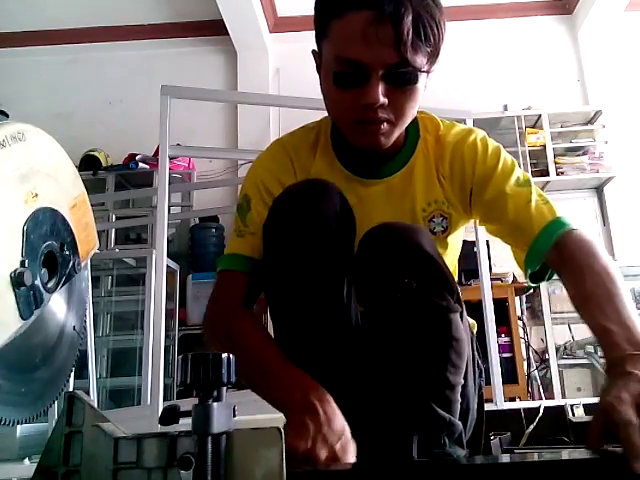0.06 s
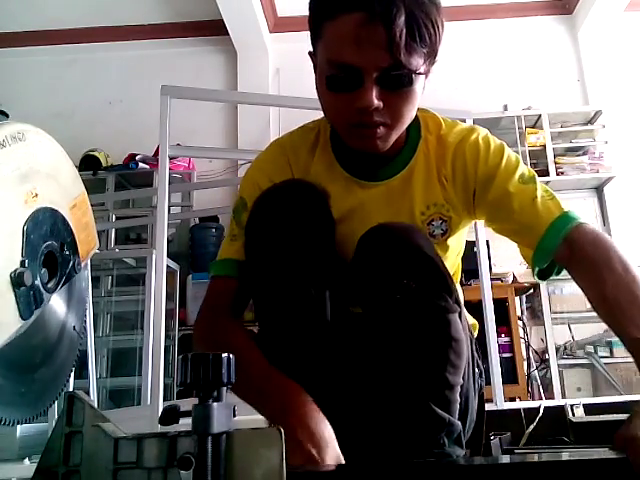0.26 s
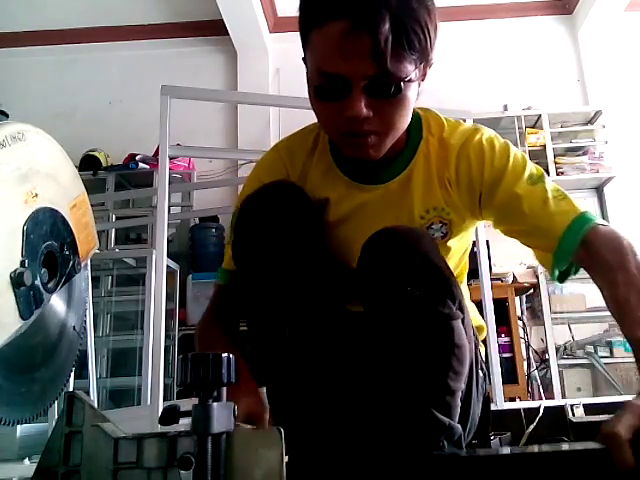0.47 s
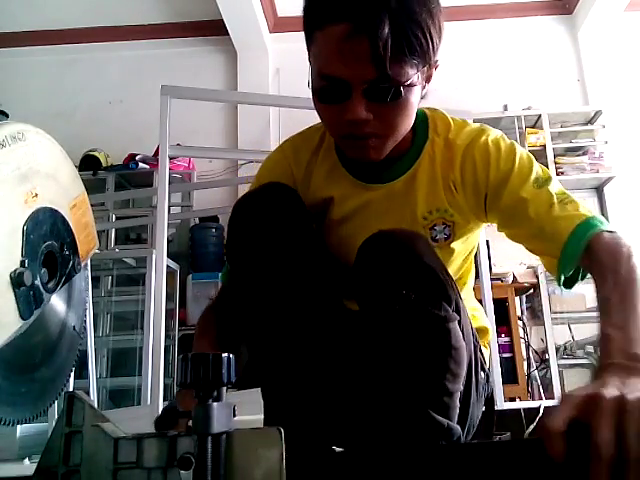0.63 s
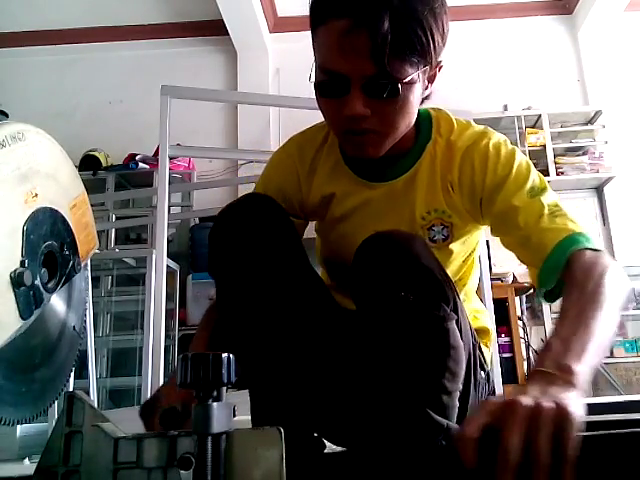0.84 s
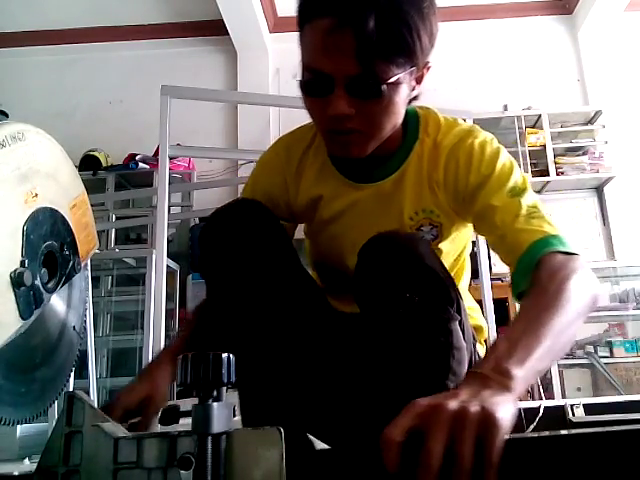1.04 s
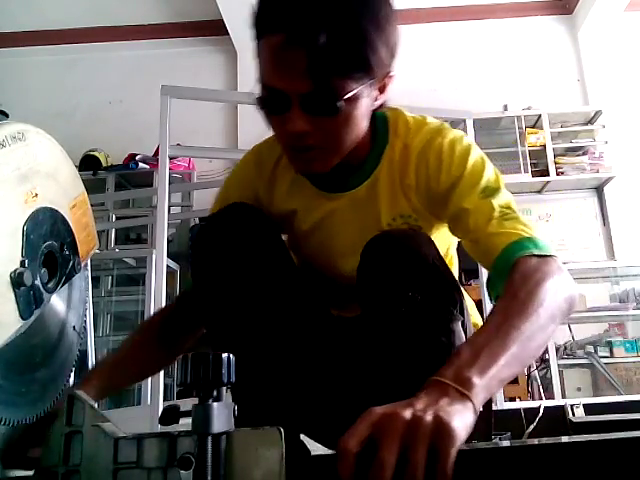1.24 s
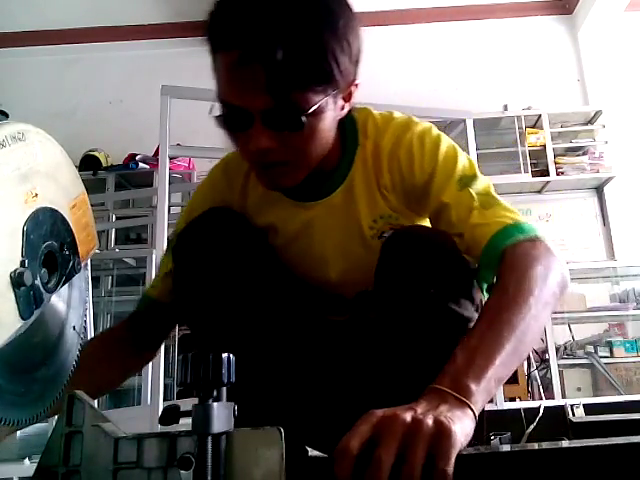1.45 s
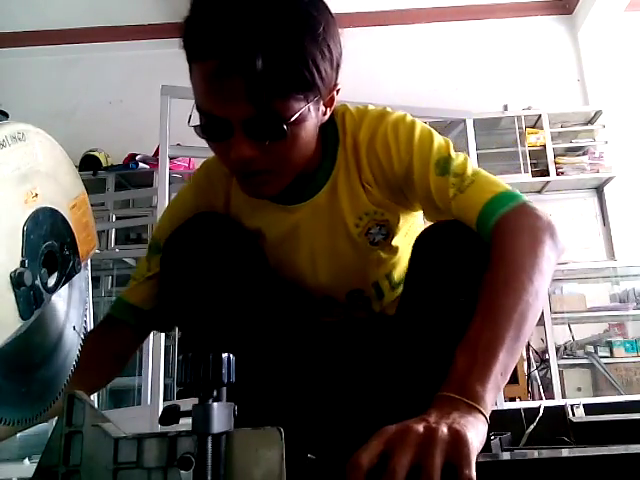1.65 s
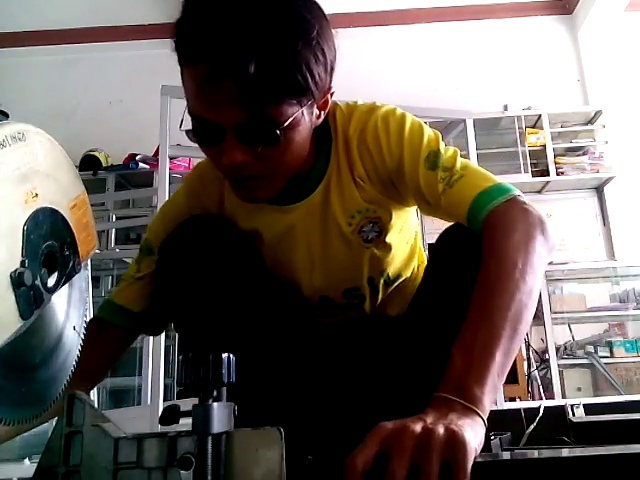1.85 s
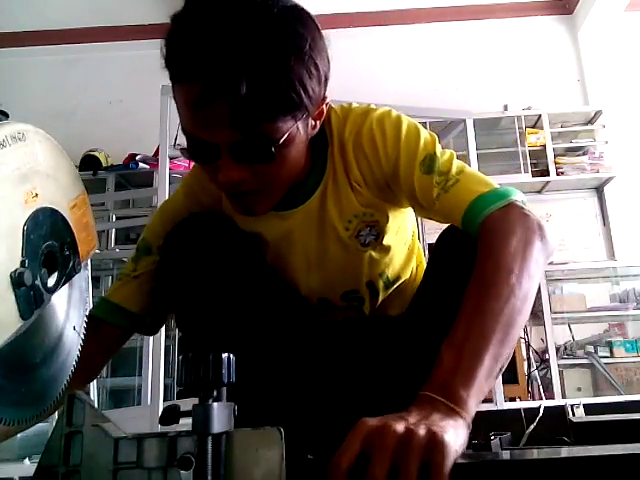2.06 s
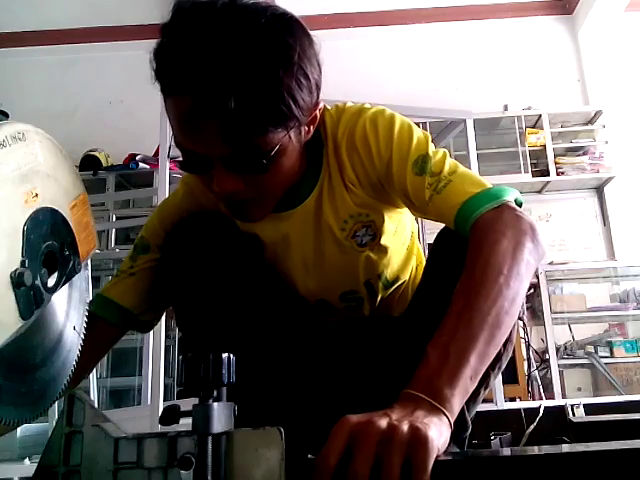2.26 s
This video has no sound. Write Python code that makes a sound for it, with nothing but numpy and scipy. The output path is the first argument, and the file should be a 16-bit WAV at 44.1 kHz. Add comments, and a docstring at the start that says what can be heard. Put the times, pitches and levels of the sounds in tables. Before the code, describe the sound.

Metal scrapes on metal over a low workshop rumble. A small piece clinks close by at 0.2 seconds, then a bar is struck and screeches, fading by 0.7 seconds. Soft bench bumps and a faint, thin squeal follow. From about 1 second to the end, a long bar slides with a hissing rasp and a wavering whirr, clanking once at around 1.7 seconds.

```python
"""Aluminium at the saw bench

Over a low workshop rumble, a small piece clinks and something bumps the bench. Metal bites on
metal: a strike and a stream of tiny slips ring a bar in a short screech. Then a long bar slides
along with a rasp whose whirr and sheen follow its speed, and clanks once on the way."""
import sys
import numpy as np
from scipy import signal
from scipy.fft import rfft, irfft, next_fast_len
from scipy.io import wavfile
from scipy.ndimage import uniform_filter1d, map_coordinates

SR = 44100
rng = np.random.default_rng(int(sys.argv[2]) if len(sys.argv) > 2 else 0)


def store_pcm(level_fs):
    """Save levels as 16-bit WAV."""
    pcm = np.round(np.clip(level_fs, -1, 1) * 32767).astype(np.int16)
    wavfile.write(sys.argv[1], SR, np.atleast_2d(pcm).T)


N = 101429
TIME = np.arange(N) / SR


def from_db(db):
    """Decibels to gain."""
    return 10 ** (np.asarray(db) / 20)


def rms_one(x):
    """Scale to rms 1."""
    return x / np.sqrt(np.mean(x ** 2) + 1e-20)


def evened(x):
    """Level out chance swells."""
    return x / np.sqrt(uniform_filter1d(x * x, size=1500) + 1e-9)


def automation(rows):
    """Breakpoints to one curve per column, sample by sample."""
    times, *columns = np.transpose(rows)
    return [np.interp(TIME, times, column) for column in columns]


def envelope(start_s, attack_s, t60_s):
    """Linear rise, exponential fall."""
    age = TIME - start_s
    return np.clip(age / attack_s, 0, 1) * from_db(-60 * np.maximum(age - attack_s, 0) / t60_s)


def highpass(x, hz):
    """Roll off the bass."""
    return signal.sosfilt(signal.butter(2, hz, "high", fs=SR, output="sos"), x)


def lowpass(x, hz, order=4):
    """Roll off the treble."""
    return signal.sosfilt(signal.butter(order, hz, fs=SR, output="sos"), x)


def coloured(x, spectrum):
    """Give a steady signal a spectrum; rms 1."""
    hz, db = np.transpose(spectrum)
    size = next_fast_len(N)
    bin_hz = np.maximum(np.fft.rfftfreq(size, 1 / SR), 1)
    gain = from_db(np.interp(np.log(bin_hz), np.log(hz), db))
    return rms_one(irfft(rfft(x, size) * gain, size)[:N])


def noise(spectrum):
    """Steady noise with a spectrum; rms 1."""
    return coloured(rng.standard_normal(N), spectrum)


def drift(rate_hz):
    """Smooth random wander; rms 1."""
    pole = np.exp(-2 * np.pi * rate_hz / SR)
    return rms_one(signal.lfilter([1], [1, -2 * pole, pole * pole], rng.standard_normal(N + SR))[SR:])


def rough_tone(hz, width_hz):
    """A tone, steady or gliding, whose strength and phase wander."""
    phase = 2 * np.pi * np.cumsum(np.broadcast_to(hz, N)) / SR
    return drift(width_hz) * np.cos(phase) + drift(width_hz) * np.sin(phase)


def ring(drive, hz, t60_s):
    """One mode: a unit click rings at height 1."""
    radius, angle = from_db(-60 / (t60_s * SR)), 2 * np.pi * hz / SR
    return signal.lfilter([.5, 0, -.5], [1, -2 * radius * np.cos(angle), radius ** 2], drive + 1e-18)


# Room tone: freq_hz, density_db
RUMBLE_SPECTRUM = [(25, -12), (45, -25), (62, -5), (80, 0), (105, -2), (150, 2), (220, -5), (330, -2.5),
                   (450, -16), (800, -17), (2000, -22.5), (3300, -18.5), (4400, -18.5), (5300, -19),
                   (7000, -37.5), (10500, -37.5), (15000, -55)]

def rumble():
    """The workshop's steady low rumble and faint hiss."""
    return from_db(-41) * noise(RUMBLE_SPECTRUM)


# Knocks on the bench: start_s, level_db, t60_s
BUMP_HITS = [(0.0, -40, 0.18), (0.182, -36, 0.036), (0.636, -36.5, 0.41), (0.668, -36, 0.37),
             (0.827, -39.5, 0.64)]
# Their dull body: freq_hz, density_db
BUMP_SPECTRUM = [(100, -26), (220, 10), (400, -3.5), (600, 1.5), (900, -4), (1150, 0.5), (1600, -6.5),
                 (2200, -42)]

def bumps():
    """Soft knocks draw dull thuds from the bench."""
    thuds = sum(from_db(db) * envelope(start, .012, t60) for start, db, t60 in BUMP_HITS)
    return thuds * noise(BUMP_SPECTRUM)


# Swells of the boom: time_s, level_db
BOOM_LEVEL = [(0, -33), (0.1, -50), (0.2, -39.5), (0.32, -54.5), (0.56, -44.5), (0.63, -46), (0.69, -36),
              (0.76, -37), (0.83, -53), (1.0, -83)]

def boom():
    """A low boom swells and fades on one pitch."""
    level_db, = automation(BOOM_LEVEL)
    return from_db(level_db) * evened(rough_tone(217.5, width_hz=9.9))


# Light brushes: start_s, level_db, t60_s
SCUFF_HITS = [(0.0, -41, 0.15), (0.617, -46, .04), (0.737, -31.5, 0.034), (0.905, -44, .15),
              (2.13, -35, 0.27)]
# Bright contact noise of scuffs and clinks: freq_hz, density_db
CONTACT_SPECTRUM = [(600, -28), (2000, -7), (3000, -18), (3800, 23.5), (5000, 19.5), (6800, -20),
                    (8300, -8.5), (10200, -1.5), (12000, -11.5), (15000, -47)]

def scuffs():
    """Light contacts give off short puffs of bright noise."""
    puffs = sum(from_db(db) * envelope(start, t60 / 10, t60) for start, db, t60 in SCUFF_HITS)
    return puffs * noise(CONTACT_SPECTRUM)


# Contacts of the small piece, then the two clicks of the bar's strike: start_s, ring_db, crack_db, contact_s
CLINK_HITS = [(0.138, -28, -37, 0.0079), (0.1838, -16.5, -24, 0.01), (0.205, 0.5, -8.5, 0.00056),
              (0.2486, -20, -13, 0.0011), (0.2518, -22, -10, 0.00072)]
# Its ring: pitch_hz, gain_db, t60_s
PIECE_MODES = [(2945, -30, .035), (3575, -20, .035), (3871, -15, .04), (4646, -2, .035), (5965, -10, .04),
               (7946, -20, .033), (8586, -24, .035), (9862, -23, .032)]

def clinks():
    """Each contact cracks and rings the small piece; longer, grazing contacts crack more softly."""
    hits, cracks = np.zeros(N), np.zeros(N)
    for start, ring_db, crack_db, contact_s in CLINK_HITS:
        hits[int(start * SR)] += from_db(ring_db)
        cracks += from_db(crack_db) * envelope(start, contact_s, t60_s=0.027)
    tone = sum((-1) ** k * from_db(db) * ring(hits, hz, t60)
               for k, (hz, db, t60) in enumerate(PIECE_MODES))
    # The piece's ring keeps to the band of its modes, with little bass and little high treble.
    tone = lowpass(highpass(tone, hz=2850), hz=10400)
    return from_db(-1.5) * tone + cracks * noise(CONTACT_SPECTRUM)


def slips(per_s=9000, spread_db=1.04):
    """Dense, uneven micro-slips of metal on metal."""
    sizes = from_db(spread_db * np.minimum(rng.exponential(1, N), 5))
    signs = rng.choice([-1, 1], N)
    return sizes * signs * (rng.random(N) < per_s / SR)


# How the metal bites: time_s, force_db, tilt_db_per_octave
BITE = [(0.247, -84, 23), (0.252, 0.5, -2), (0.29, -1, 0), (0.326, -2.5, -4), (0.341, 5, -1),
        (0.366, -3.5, 5), (0.383, 3.5, -0.5), (0.415, -2.5, 2), (0.437, 1.5, 0), (0.49, -1.5, 1),
        (0.54, -5, 0.5), (0.6, -11, -1), (0.66, -18, -7.5), (0.76, -27.5, -10), (0.86, -34, -5.5)]
# Ring of the scraped bar: pitch_hz, scraped_db, struck_db
SCRAPED_BAR_MODES = [(738, -51, -45), (1068, -50, -31), (1243, -40, -46), (1460, -49, -41),
                     (1828, -41, -36), (1875, -42, -35), (2331, -44, -39), (2498, -42, -30),
                     (2790, -44, -34), (2870, -42, -39), (3241, -36, -38), (3276, -35, -26),
                     (3678, -33, -26), (3986, -27, -24), (4021, -30, -24), (4106, -28, -27),
                     (4247, -30, -38), (4344, -26, -24), (4382, -29, -27), (4490, -34, -41),
                     (4615, -33, -44), (4700, -37, -32), (4786, -25, -37), (4988, -31, -26),
                     (5266, -31, -27), (5740, -38, -58), (6315, -39, -51), (6928, -39, -45),
                     (7650, -49, -55), (8193, -50, -46), (10088, -44, -56), (10280, -50, -43)]
# Grit at the contact: freq_hz, density_db
RASP_SPECTRUM = [(600, -58), (950, -34), (1300, -18.5), (2100, -22), (3000, -14.5), (3600, -6), (4400, 2.5),
                 (5100, -3), (5900, -10), (7000, -17.5), (8800, -22), (11500, -21), (15000, -37)]

def screech(strike_s=.2505, strike_db=1.5, scrape_db=-8, rasp_db=-21, centre_hz=4140):
    """The bar is struck, then chattering slips rasp and keep it ringing as the brightness shifts."""
    force_db, tilt = automation(BITE)
    force_db += drift(rate_hz=43)  # chatter, 1 dB rms
    strike, bar = np.zeros(N), np.zeros(N)
    strike[int(strike_s * SR)] = from_db(strike_db)
    for k, (hz, scraped_db, struck_db) in enumerate(SCRAPED_BAR_MODES):
        t60 = 0.16 * (centre_hz / hz) ** .5  # low modes ring longer
        push = slips() * from_db(force_db + tilt * np.log2(hz / centre_hz))
        bar += from_db(scrape_db + scraped_db) * rms_one(ring(push, hz, t60))
        bar += (-1) ** k * from_db(struck_db) * ring(strike, hz, t60)
    bar = lowpass(highpass(bar, hz=352), hz=11000)
    rasp = coloured(slips(), RASP_SPECTRUM)
    treble = signal.sosfiltfilt(signal.butter(2, 5800, "high", fs=SR, output="sos"), rasp)
    rasp += treble * (from_db(2.2 * tilt) - 1)  # a high shelf rides the tilt
    return bar + from_db(rasp_db + force_db) * rasp


# Groan under the screech: time_s, pitch_hz, level_db
GROAN_CURVE = [(0.25, 720, -52), (0.295, 722, -41), (0.37, 745, -46), (0.42, 772, -40), (0.49, 765, -47.5),
               (0.55, 735, -51), (0.61, 730, -78)]

def groan():
    """A wavering stick-slip tone of the scraped bar."""
    hz, level_db = automation(GROAN_CURVE)
    return from_db(level_db) * evened(rough_tone(hz, width_hz=25))


# Squeal leading into the slide: time_s, pitch_hz, level_db
SQUEAL_CURVE = [(0.72, 4450, -48), (0.78, 4420, -43), (0.88, 4400, -48), (0.93, 4470, -42.5),
                (1.0, 4330, -38.5), (1.07, 4150, -54), (1.14, 4100, -66)]

def squeal():
    """The long bar squeals thinly as it starts to move."""
    hz, level_db = automation(SQUEAL_CURVE)
    return from_db(level_db) * rough_tone(hz, width_hz=63)


# Low-end weight of the thump: freq_hz, density_db
THUMP_SPECTRUM = [(15, -6), (28, 0), (50, -10), (80, 6), (140, -13), (400, -47), (2000, -90)]

def thump():
    """One deep thump comes through the floor."""
    return from_db(-39.5) * envelope(start_s=0.75, attack_s=.03, t60_s=0.44) * noise(THUMP_SPECTRUM)


# Ring of the long bar: pitch_hz, level_db
LONG_BAR_MODES = [(848, -17), (1330, 0.5), (2894, 2), (3137, 0), (3264, 2.5), (3645, 1), (3771, -25),
                  (3875, 5.5), (4046, 6), (4200, 5.5), (4380, -19), (4678, 5.5), (5018, -18), (5580, 1.5)]

def long_bar():
    """Steady rubbing keeps the long bar's modes ringing; rms 1."""
    drive = slips()
    modes = sum(from_db(db) * rms_one(ring(drive, hz, t60_s=.12)) for hz, db in LONG_BAR_MODES)
    return rms_one(lowpass(modes, hz=6260))


# Fader ride of the slide: time_s, level_db
SLIDE_LEVEL = [(0.9, -70), (0.965, -45), (0.99, -36.5), (1.06, -35.5), (1.14, -32.5), (1.33, -33.5),
               (1.42, -33.5), (1.68, -31.5), (1.9, -30.5), (2.02, -30.5), (2.18, -31.5), (2.3, -36)]
# Speed, as the rate of passing ridges: time_s, ridge_hz, whirr_db
SLIDE_SPEED = [(0.95, 950, -40), (1.1, 1160, 0), (1.17, 1295, -17), (1.32, 1385, -2.5), (1.45, 1332, -3.5),
               (1.53, 1273, 1.5), (1.62, 1223, -1.5), (1.7, 1182, -3), (1.82, 1113, -0.5), (1.92, 1072, -6),
               (2.03, 1284, -10.5), (2.15, 1205, -7.5), (2.3, 1082, -3)]
# Whirr of the ridges: harmonic_number, gain_db
WHIRR_HARMONICS = [(1, -12), (2, -16), (3, -14), (4, -25), (6, -27), (9, -47)]
# Sheen of the surface grain when ridges pass at sheen_at_hz: freq_hz, density_db
SHEEN_SPECTRUM = [(2500, -14), (4500, -3), (5500, 6), (6900, -13), (7450, -11), (7850, -28), (11000, -35),
                  (11700, -24), (12300, -35), (16000, -55)]
# Friction hiss: freq_hz, density_db
FRICTION_SPECTRUM = [(550, -32), (800, -11.5), (1000, -26), (1300, -10), (1650, -9.5), (2000, -15),
                     (2800, -7.5), (3450, -10), (4100, 3), (4700, -6), (5700, -15.5), (6800, -17),
                     (8200, -40), (9700, -34), (10700, -30), (12000, -40), (15000, -68)]

def slide(sheen_at_hz=1309, patchy_db=2, flutter_db=0.78):
    """Friction hisses and rings the long bar; its ridges whirr and its grain hisses, pitched by speed."""
    level_db, = automation(SLIDE_LEVEL)
    ridge_hz, whirr_db = automation(SLIDE_SPEED)
    whirr = sum(from_db(db + patchy_db * drift(3.9)) * rough_tone(harmonic * ridge_hz, width_hz=30)
                for harmonic, db in WHIRR_HARMONICS)
    travel = np.cumsum(ridge_hz) / sheen_at_hz  # position along the grain, in samples
    sheen = map_coordinates(noise(SHEEN_SPECTRUM), [travel], order=3, mode="wrap")
    rub = from_db(-2) * coloured(slips(), FRICTION_SPECTRUM) + from_db(-5.5) * long_bar()
    gain = from_db(level_db + flutter_db * drift(24))
    return gain * (rub + from_db(whirr_db) * whirr + from_db(-13) * sheen)


# The long bar's knock: start_s, level_db
CLANK_HITS = [(1.732, -20.5)]
# Its crash: freq_hz, density_db
CLANK_SPECTRUM = [(150, -15), (300, -3.5), (550, -6.5), (820, -3), (1050, -4.5), (1700, 2.5), (2100, -5),
                  (2900, 2.5), (4200, 0.5), (6000, -1.5), (7800, -28), (9000, -18), (10700, -13.5),
                  (12000, -36), (15000, -49)]

def clank(attack_s=0.011, crash_t60_s=0.18, tail_t60_s=0.68):
    """The long bar rattles on the bench: a ringing crash leaves a dull tail and a rough, hollow note."""
    crash = noise(CLANK_SPECTRUM) + from_db(-3.5) * long_bar()
    dull = rms_one(lowpass(noise(CLANK_SPECTRUM), hz=1470, order=1))
    note = evened(rough_tone(837, width_hz=16.2))
    out = np.zeros(N)
    for start, db in CLANK_HITS:
        tail = from_db(db - 9.5) * dull + from_db(-36.5) * note
        out += from_db(db) * envelope(start, attack_s, crash_t60_s) * crash
        out += envelope(start, attack_s, tail_t60_s) * tail
    return out


def workshop_reverb(send):
    """The room answers with a short, diffuse tail."""
    tail = rng.standard_normal(N) * envelope(start_s=0.024, attack_s=0.018, t60_s=0.17)
    return signal.fftconvolve(send, tail / np.sqrt(np.sum(tail ** 2)))[:N]


def scene():
    """The bench sounds in the room, over the rumble; scuffs and clinks sit close and nearly dry."""
    close = scuffs() + clinks()
    bench = bumps() + boom() + screech() + groan() + squeal() + thump() + slide() + clank()
    room = workshop_reverb(from_db(-13) * bench + from_db(-26) * close)
    return (close + bench + room + rumble())[None]


def record(dry):
    """Peaks clip at full scale, then a steep filter cuts the top."""
    high_cut = signal.ellip(10, .1, 90, 15200, fs=SR, output="sos")
    return signal.sosfilt(high_cut, np.clip(dry, -1, 1))


dry = scene()
out = record(dry)
store_pcm(out)
```